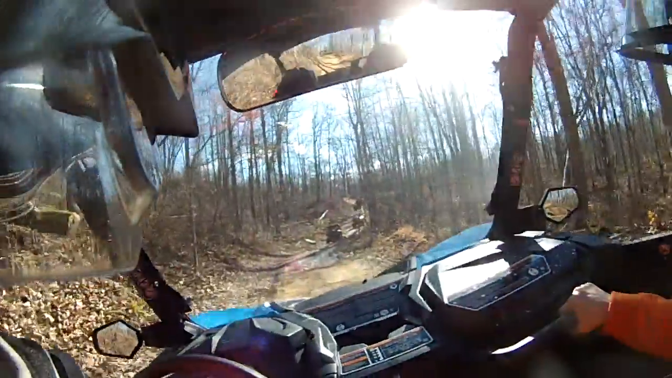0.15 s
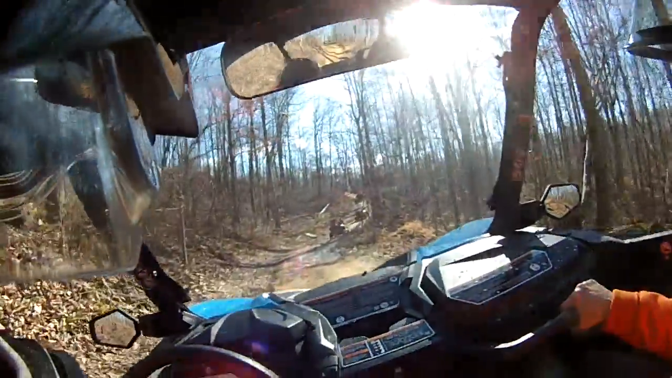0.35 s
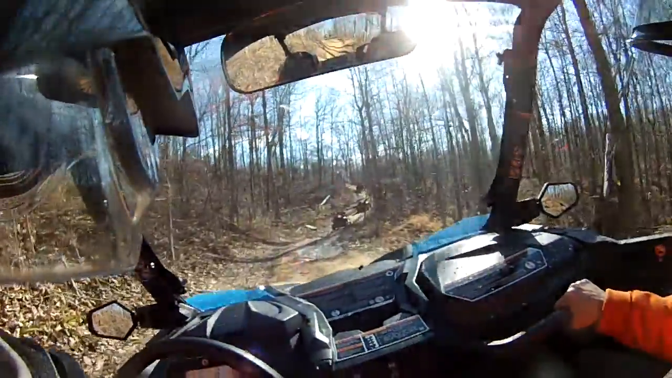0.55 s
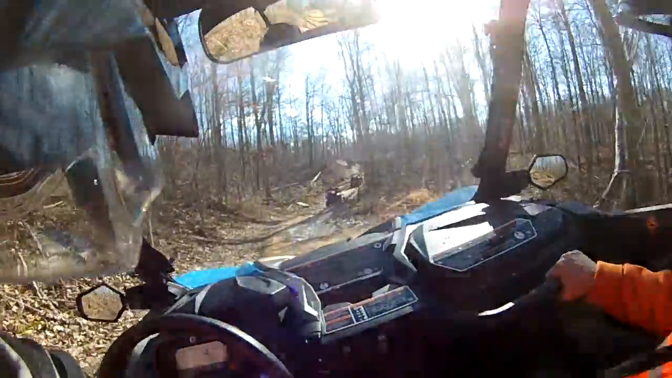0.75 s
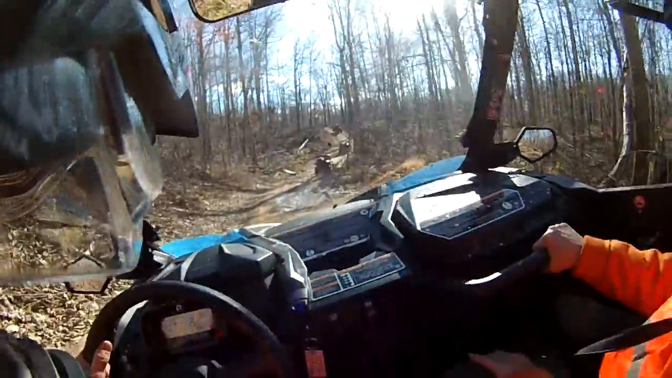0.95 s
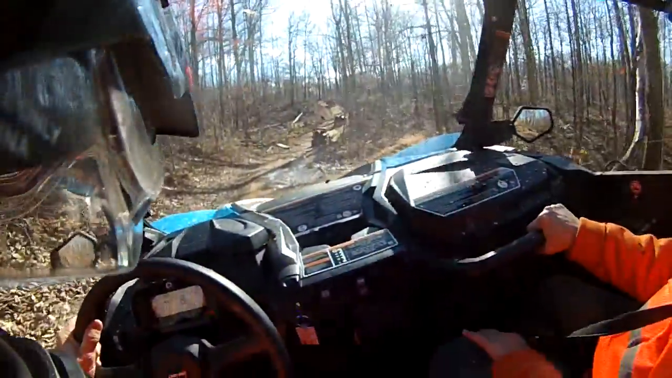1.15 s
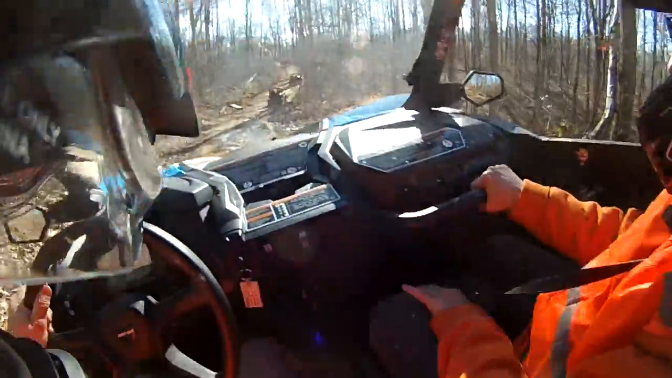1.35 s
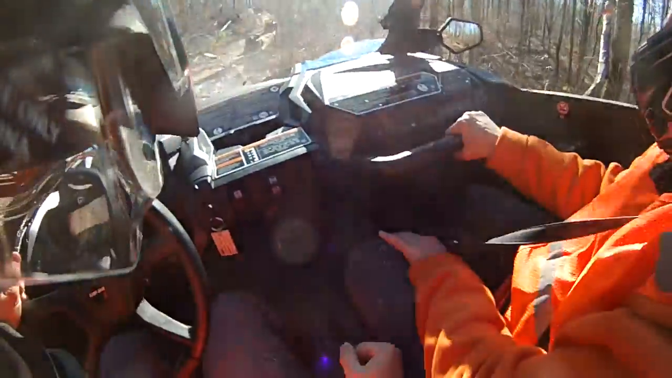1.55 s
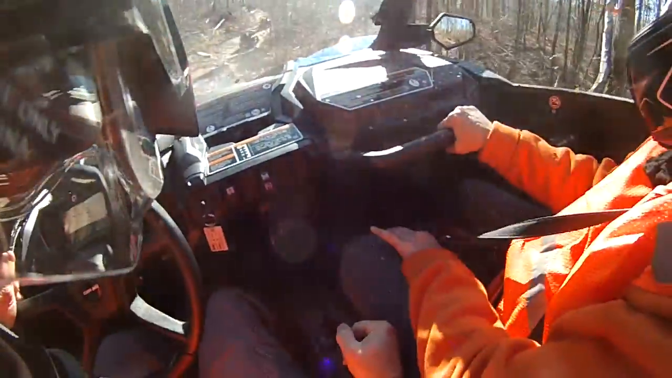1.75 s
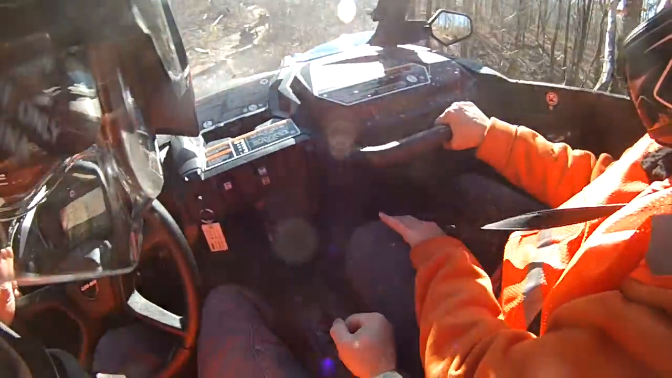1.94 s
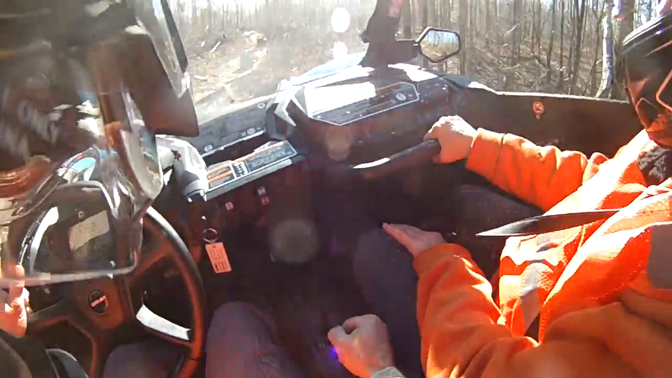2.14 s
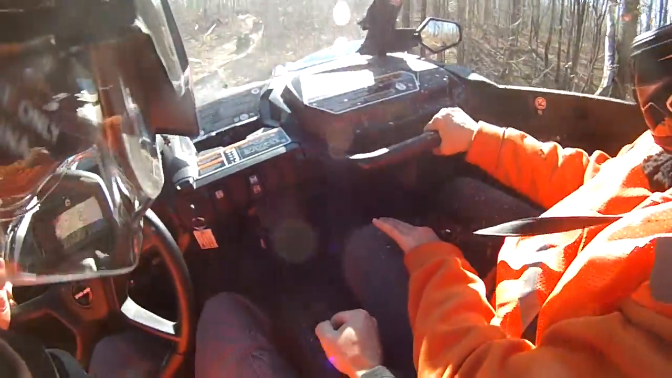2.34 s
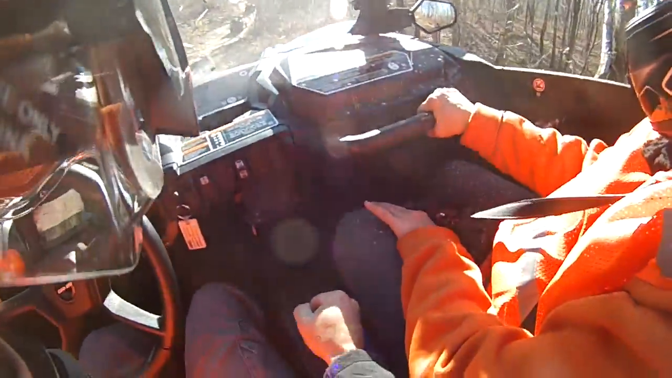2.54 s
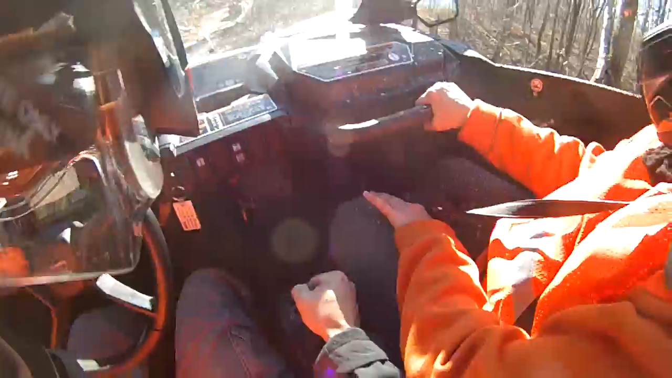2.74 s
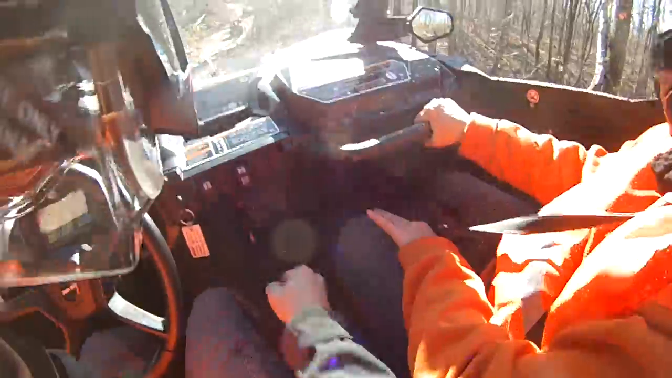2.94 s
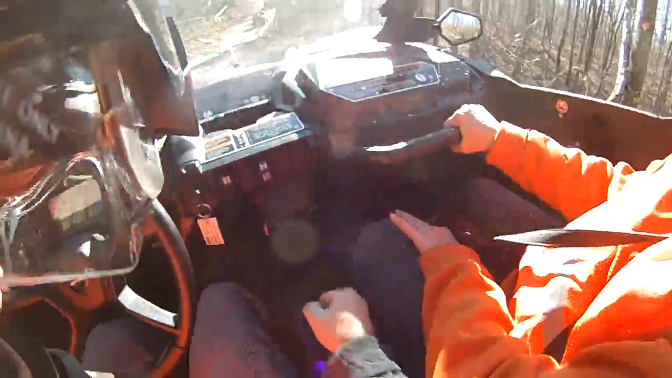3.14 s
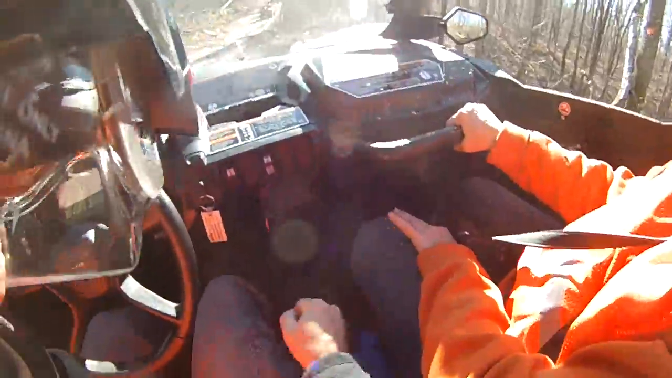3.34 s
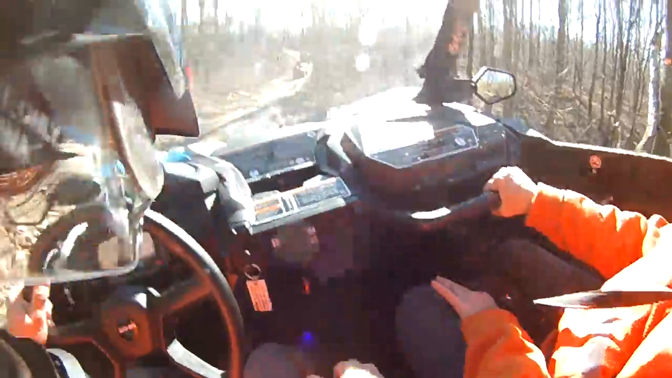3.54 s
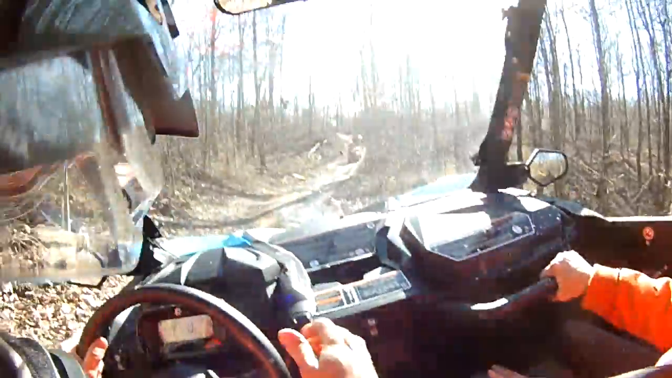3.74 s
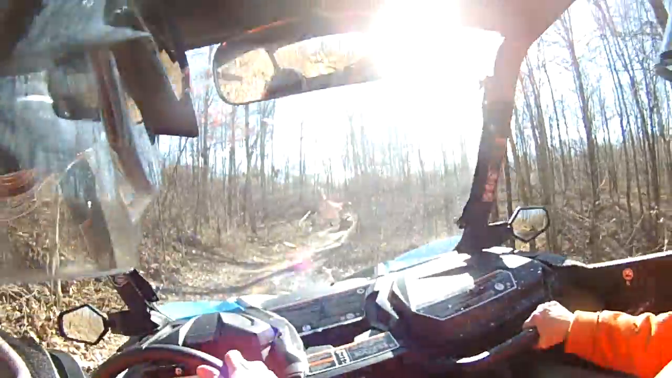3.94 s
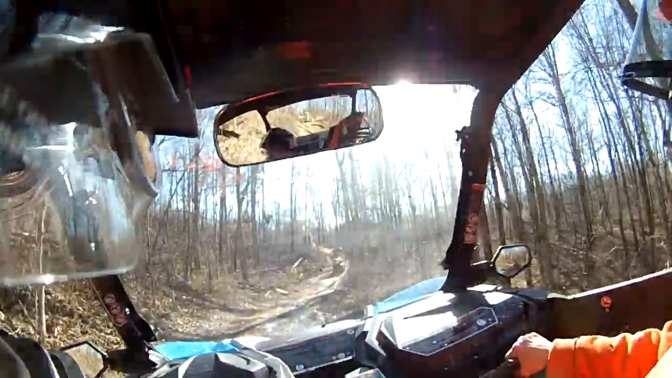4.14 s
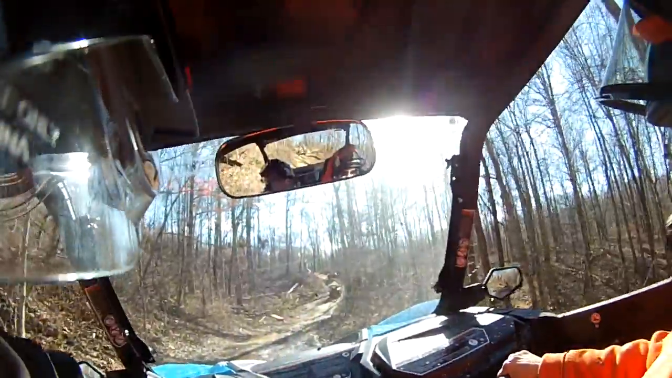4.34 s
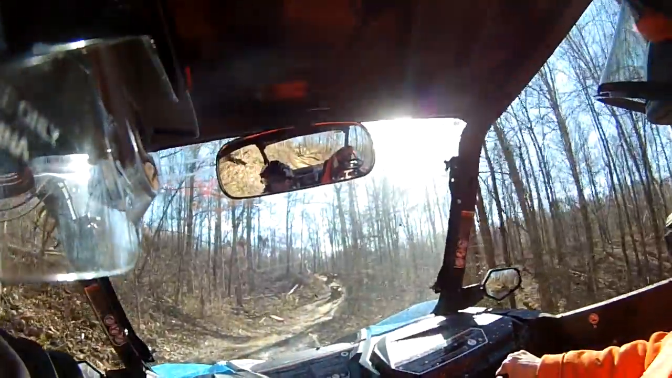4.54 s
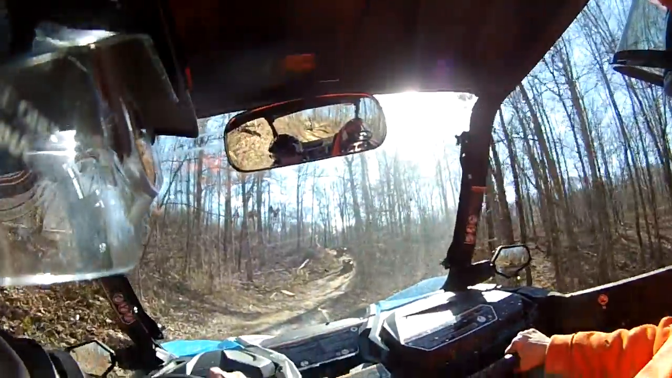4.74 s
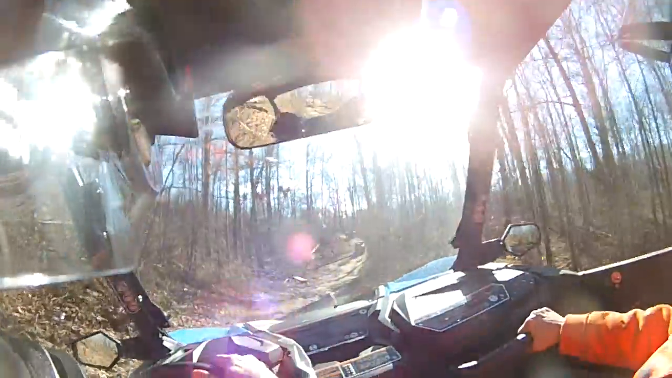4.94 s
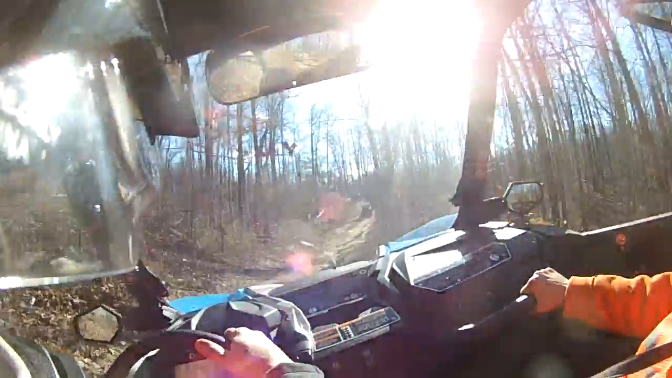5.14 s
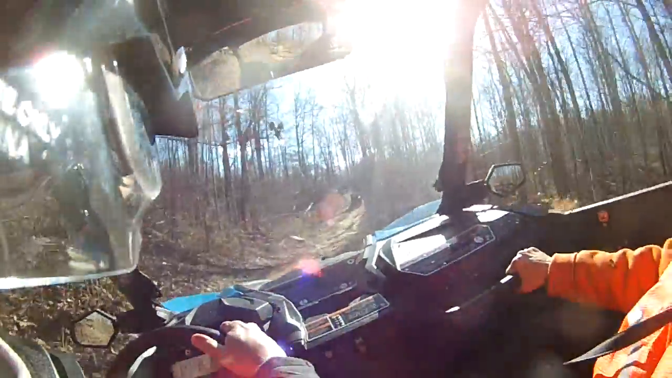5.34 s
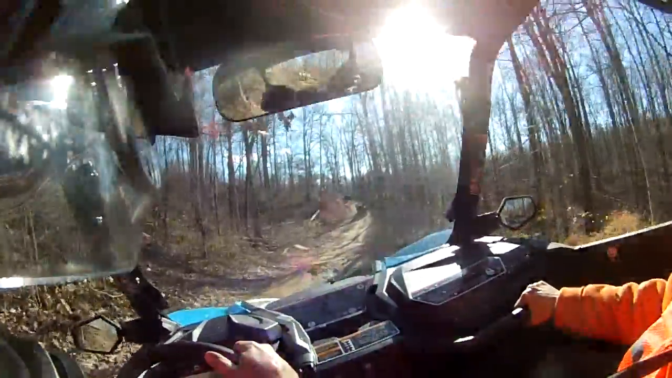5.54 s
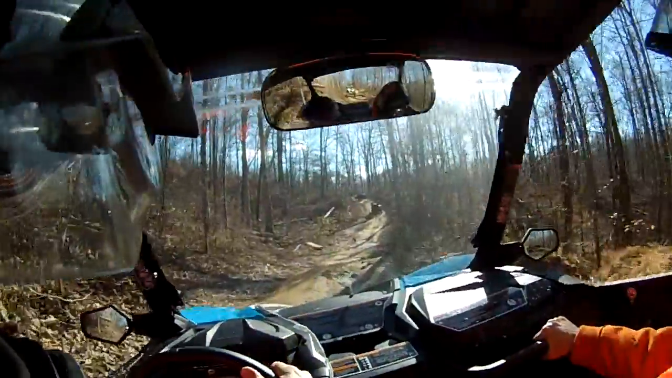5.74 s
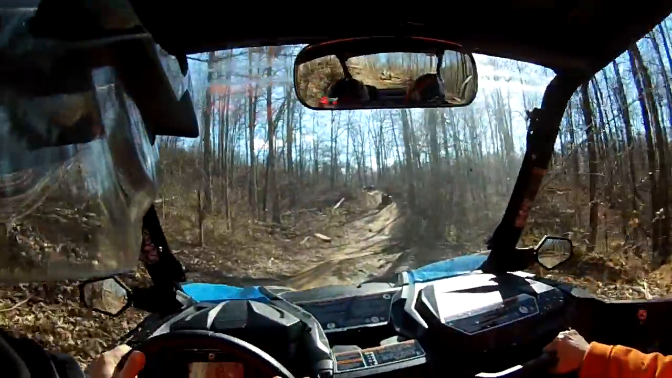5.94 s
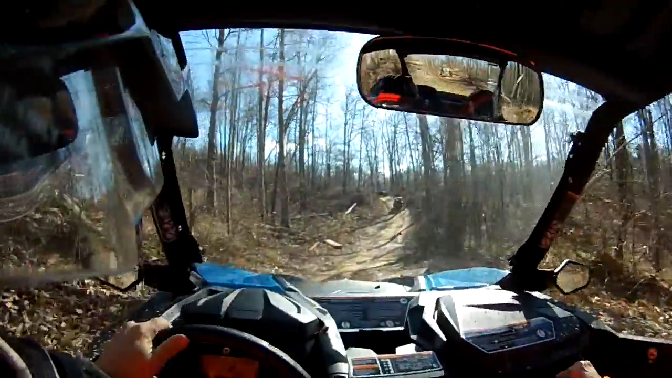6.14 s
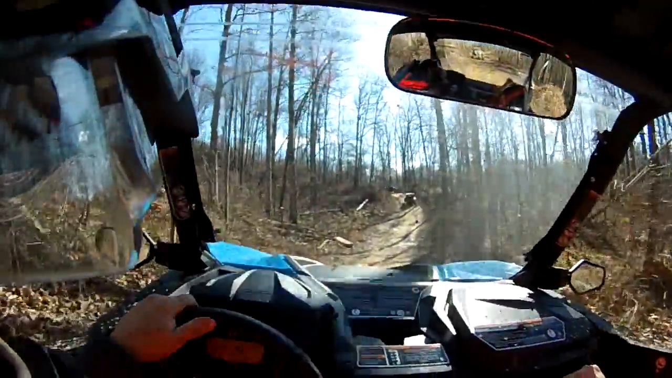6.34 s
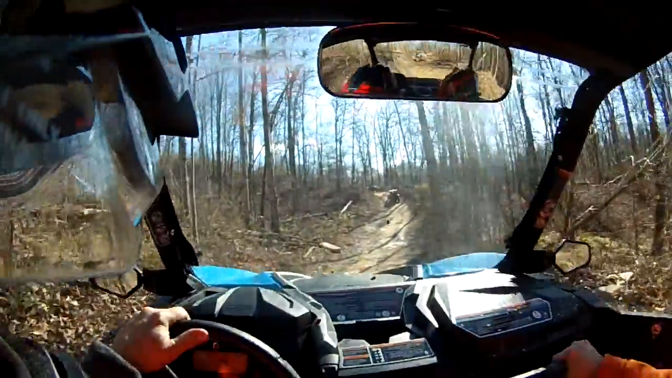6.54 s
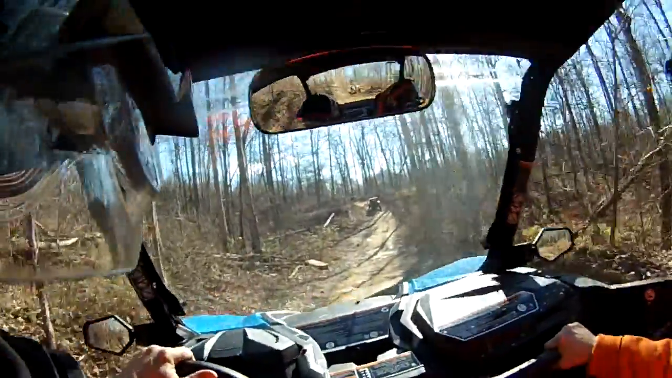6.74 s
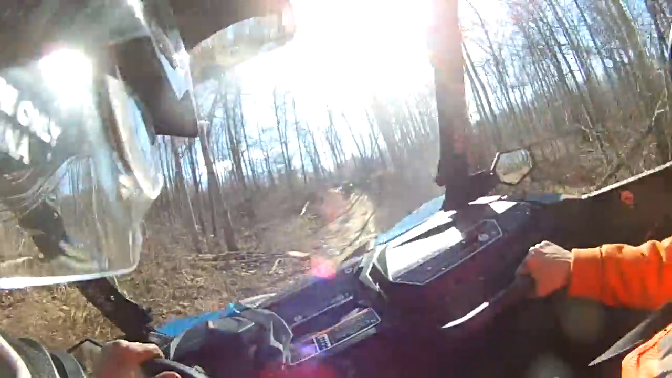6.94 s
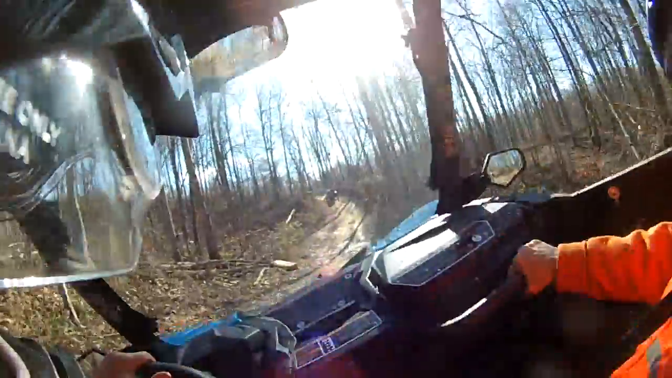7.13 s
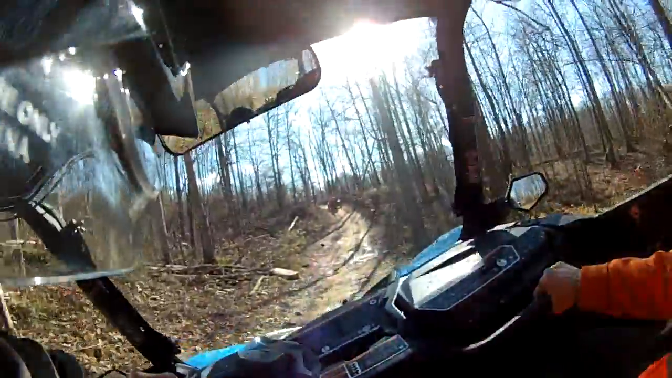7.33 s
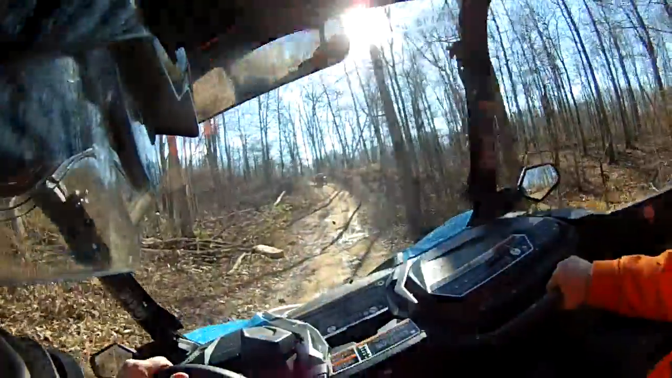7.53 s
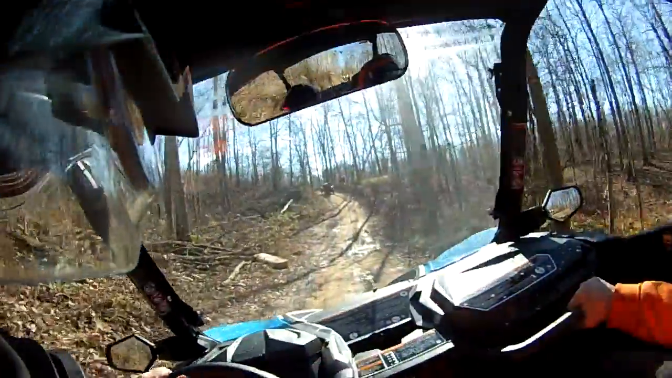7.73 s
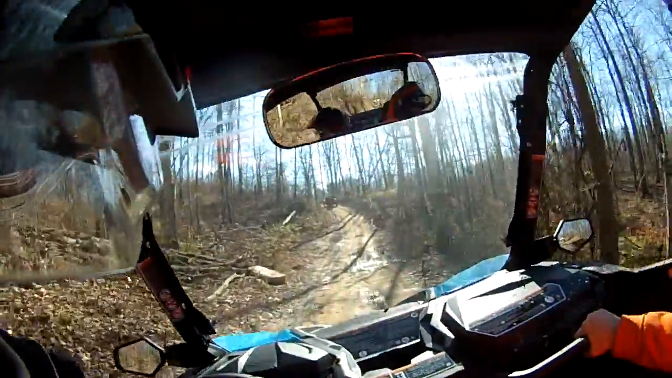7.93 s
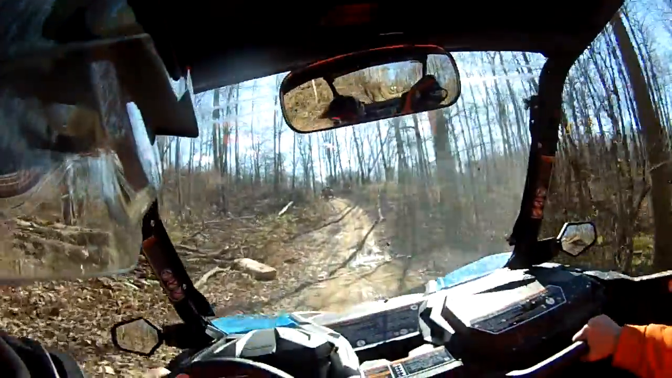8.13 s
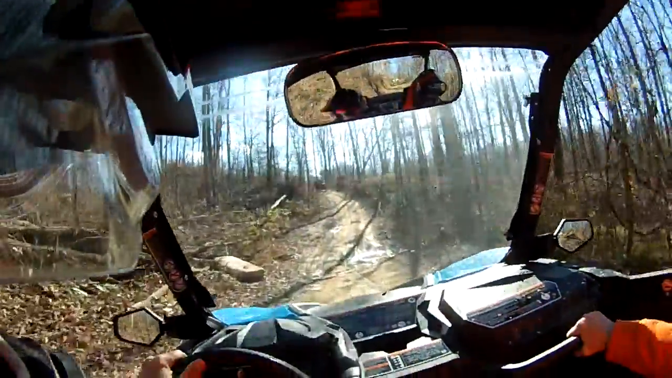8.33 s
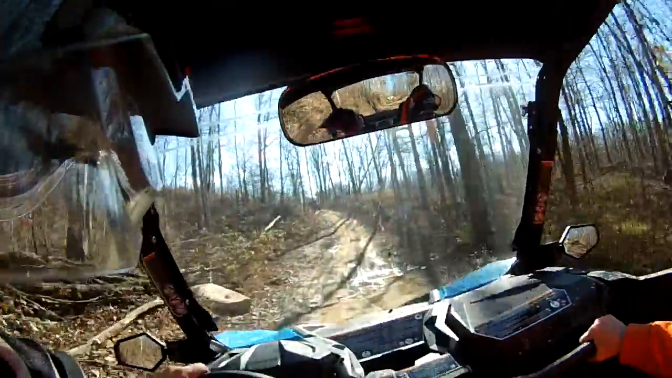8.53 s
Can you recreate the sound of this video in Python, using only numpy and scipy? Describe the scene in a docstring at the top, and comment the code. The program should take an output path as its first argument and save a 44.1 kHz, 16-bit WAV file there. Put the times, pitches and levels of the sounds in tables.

```python
"""A twin-cylinder engine booms, heard from the open cab of an off-road buggy on a leafy forest trail.
It drops to idle while the brakes squeak faintly, something loose knocks in the cab, twice clearly,
and it pulls away with gear whine and clatter over chassis rumble and crackling leaves.
The exhaust is a harmonic series on the four-stroke cycle rate; order k lies at k times that rate.
A second machine drones nearby, and beats arise where its harmonics lie close to the buggy's."""
import sys
import numpy as np
from scipy import signal
from scipy.fft import rfft, irfft, next_fast_len
from scipy.io import wavfile
from scipy.ndimage import map_coordinates

SR = 44100
rng = np.random.default_rng(int(sys.argv[2]) if len(sys.argv) > 2 else 0)


def bounce(signal):
    """Save signal as a 16-bit WAV file at the path given by the first command-line argument."""
    frames = np.transpose(np.atleast_2d(signal))
    limited = np.clip(frames, -1, 1)
    pcm = np.round(limited * 32767).astype(np.int16)
    wavfile.write(sys.argv[1], SR, pcm)


N = 382788
TIME = np.arange(N) / SR

# Spectra of chassis rumble and of trail hiss: f/Hz, relative density/dB
RUMBLE_SPECTRUM = [(12, -9.5), (28, -2), (45, 4.5), (62, 2.5), (78, -2.5), (110, -7), (160, 4), (200, -10),
                   (250, -15.5), (400, -29), (900, -53.5)]
HISS_SPECTRUM = [(3000, 3.5), (4800, -8.5), (5700, -9.5), (6400, -2.5), (7800, -2), (9200, 1),
                 (10800, -5.5), (12500, -9), (13900, -2), (15200, -11)]
# Cycle rate of the second machine: t/s, f/Hz
NEIGHBOUR_REVS = [(0, 36), (1.6, 38.8), (2.3, 38.3), (2.52, 35.7), (3.05, 38.5), (3.42, 37.6), (3.75, 32.6),
                  (4.1, 31.2), (4.5, 31.1), (5.1, 27.7), (5.42, 27.2), (5.65, 30.4), (5.95, 27.7),
                  (6.25, 27.1), (6.7, 31.1), (7.15, 30.1), (7.6, 31.8), (8.68, 31.9)]
# Its strength through the trees: t/s, level/dB
NEIGHBOUR_LEVEL = [(0, -40), (1.35, -36.5), (2.05, -41), (3.1, -30.5), (3.7, -34.5), (4.4, -30.5),
                   (5.35, -30.5), (5.75, -34.5), (7.2, -35.5), (8.68, -33.5)]
# Its harmonics: order, relative level/dB
NEIGHBOUR_HARMONICS = [(1, -4.5), (2, -1.5), (3, -2), (4, -11.5), (5, 0.5), (8, -4), (10, -11.5)]
# Its transmission through woods and cab: f/Hz, gain/dB
WOODS_RESPONSE = [(30, -11), (55, -9.5), (64, -4), (76, 4), (88, 3), (100, -5.5), (115, -3), (135, 2.5),
                  (160, 2.5), (178, -9.5), (195, -10.5), (300, -16.5), (390, -15)]
# Brake squeaks: t/s, duration/s, start f/Hz, end f/Hz, level/dB
BRAKE_SQUEAKS = [(0.718, 0.036, 9560, 9400, -60), (0.869, 0.041, 9620, 9500, -66),
                 (0.937, 0.055, 7600, 7400, -56), (0.997, .05, 7700, 7560, -64),
                 (1.14, .05, 14020, 14080, -70), (1.17, .05, 7500, 7490, -66),
                 (1.5, 0.045, 14060, 14130, -56), (1.778, 0.1, 9700, 9550, -59),
                 (1.894, 0.1, 7570, 7550, -62.5), (1.991, 0.11, 7520, 7500, -56),
                 (2.104, 0.11, 7430, 7570, -60.5)]
# Knocks in the cab: t/s, level/dB, time to decay by 60 dB/s
CAB_KNOCKS = [(2.673, -45.5, .08), (2.924, -36, 0.14), (2.939, -44, 0.053), (2.966, -42, 0.075),
              (3.322, -30.5, 0.079), (3.344, -49, 0.055), (3.875, -45, 0.18), (7.08, -35, 0.072)]
# Spectrum of the loose part: f/Hz, relative density/dB
PART_SPECTRUM = [(150, -28), (310, 13), (400, 6), (490, 2), (700, -7), (1100, -9), (1390, 2.5),
                 (1560, -0.5), (2035, -1), (2600, -15), (3450, -21), (4800, -34), (8500, -24.5),
                 (15000, -35)]
# Cycle rate of the buggy's engine: t/s, f/Hz
ENGINE_REVS = [(0, 34.03), (0.43, 31.89), (1, 25.75), (1.72, 15.18), (3.6, 14.97), (3.88, 18.92),
               (4.12, 24.72), (4.55, 30.05), (4.87, 30.31), (5.29, 37.81), (6, 37.85), (6.3, 36.62),
               (6.57, 33.05), (6.87, 32.24), (7.13, 34.83), (7.3, 30.46), (7.53, 33.55), (7.82, 34.47),
               (8.32, 38.43), (8.53, 35.89), (8.68, 36.9)]
# The driver's foot: t/s, throttle opening (0-1)
THROTTLE_OPENING = [(0, 0.03), (3.85, 0.05), (3.9, 0.33), (4.35, 1), (4.8, .8), (5.1, 0.98), (5.85, 0.6),
                    (6.35, .72), (6.68, .36), (7.05, 0.45), (7.33, 0.2), (7.6, 0.36), (8.25, 0.72),
                    (8.68, 0.36)]
# Meshing tones of gear teeth and chain links: order, relative level/dB
GEAR_ORDERS = [(22, -54), (24, -53), (34, -52.5), (40, -54), (44, -47.5), (47, -54), (52, -54.5), (59, -53)]
# Resonances of the gear casing: f/Hz, gain/dB
CASING_RESPONSE = [(700, -7.5), (835, -0.5), (1000, -10.5), (1200, -8.5), (1295, -1), (1370, -9.5),
                   (1470, -6.5), (1570, -8.5), (1670, -4), (1760, -3), (1950, -7), (2240, -7.5), (2500, -8)]
# Spectrum of valve gear and belt drive: f/Hz, relative density/dB
CLATTER_SPECTRUM = [(290, -43), (500, 3), (542, 3), (762, -10), (842, -3), (913, -2), (989, -2.5),
                    (1160, -5), (1280, -8.5), (1680, -3.5), (1860, -7.5), (2320, -5.5), (3200, -17.5),
                    (4240, -47), (5500, -33), (7150, -67), (12100, -120)]
# Panel modes: f/Hz, bandwidth/Hz, gain/dB
PANEL_MODES = [(823, 11, 3.5), (1020, 26, -5), (1360, 38, -2), (1487, 135, -2.5), (1720, 34, -9),
               (2030, 18, -1.5), (2268, 16, -6.5), (3135, 5.2, -1.5)]
# Spectrum of the turbulent gas: f/Hz, relative density/dB
ROAR_SPECTRUM = [(120, -22), (215, -19), (250, -2), (290, 13.5), (335, -8.5), (390, 13.5), (450, -5),
                 (520, -32), (700, 0), (1100, -48), (3000, -58)]
# Briefly prominent exhaust overtones: start t/s, end t/s, order, relative level/dB
GROWL_EVENTS = [(6.15, 6.85, 8, -39), (6.7, 7.2, 12, -39), (7.45, 7.85, 11, -41)]
# Response of the pipe, for the rasping orders: f/Hz, gain/dB
PIPE_RESPONSE = [(14, -14), (26, 5), (37, 3), (60, 1), (130, 13.5), (200, -5), (270, -6.5), (325, -9.5),
                 (385, -8.5), (520, -15.5), (680, -20.5), (860, -25), (1700, -28.5), (2400, -33.5)]
# The boom, the fourth exhaust order: t/s, level/dB
BOOM_LEVEL = [(0, -20), (.5, -28), (.95, -25), (1.3, -34.5), (1.8, -56.5), (3.65, -30), (4.1, -25.5),
              (4.9, -24.5), (5.15, -15.5), (5.62, -16), (6.22, -29), (6.48, -21.5), (7, -32.5), (7.17, -22),
              (7.38, -33.5), (7.8, -20.5), (8.15, -18.5), (8.68, -29)]
# The orders around it: order, level/dB, full-throttle gain/dB, overrun gain/dB
THUMP_ORDERS = [(2, -36.5, 2, 6.5), (3, -34.5, 1.5, 8), (5, -39, 8.5, 0.5), (6, -42.5, 7, -5)]
# Response of the cab to those orders: f/Hz, gain/dB
CAB_RESPONSE = [(30, -5), (45, 0.5), (62, 5), (78, -1.5), (90, 2.5), (110, -2), (140, 3.5), (165, 4),
                (188, -0.5), (205, -2.5), (228, 0), (260, -5.5)]

# Level laws: base level/dB, gain per octave of revs/dB, full-throttle gain/dB, overrun gain/dB
RASP_LAW = (-46, 8.5, 6.5, -1)
CLATTER_LAW = (-45.5, 9.5, 5, 2)
HISS_LAW = (-58, 11.5, 2, 0.6)
WHINE_LAW = (-4.5, 19, 0.5, -0.5)
IDLE_HZ, CRUISE_HZ = 15, 32  # cycle rates
BOOM_ORDER, THUMP_DB_PER_OCTAVE = 4, 6.5


def gain_of(db):
    """Amplitude ratio: tenfold for every 20 dB."""
    return 10 ** (np.asarray(db) / 20)


def unit_rms(x):
    """Normalisation to unit mean power."""
    return x / np.sqrt(np.mean(x ** 2) + 1e-20)


def curves(rows):
    """Linear interpolation of each column of a time table at every sample."""
    times, *columns = np.transpose(rows)
    return [np.interp(TIME, times, column) for column in columns]


def db_at(spectrum, hz):
    """Interpolation of a spectrum's level on a logarithmic frequency axis."""
    f, db = np.transpose(spectrum)
    return np.interp(np.log(hz + 1), np.log(f + 1), db)


def coloured(x, spectrum):
    """Filtering by multiplication in the frequency domain; the result has rms 1."""
    size = next_fast_len(N)
    response = gain_of(db_at(spectrum, np.fft.rfftfreq(size, 1 / SR)))
    return unit_rms(irfft(rfft(x, size) * response, size)[:N])


def wander(per_s):
    """Smooth random modulation of rms 1: a spline through per_s random values a second."""
    knots = rng.standard_normal(4096)
    position = np.arange(0, N, 32) / SR * per_s
    return unit_rms(map_coordinates(knots, [position], order=3, mode="wrap")).repeat(32)[:N]


def add(mix, start_s, sound):
    """Superposition of a sound on the mix from start_s onward."""
    part = mix[round(start_s * SR):][:len(sound)]
    part += sound[:len(part)]


def crank_angle(cycle_hz):
    """Phase of the four-stroke cycle, the integral of its rate; jitter makes firings early or late."""
    return 2 * np.pi * np.cumsum(cycle_hz) / SR + .02 * wander(40)


def overrun(cycle_hz, throttle, shut=.15, span_hz=12):
    """Engine braking, 0-1: the wheels drive the engine when the throttle is shut above idle."""
    return np.clip(1 - throttle / shut, 0, 1) * np.clip((cycle_hz - IDLE_HZ) / span_hz, 0, 1)


def layer_level(law, cycle_hz, throttle):
    """Level in dB from a power law in revs, with added terms for load and overrun."""
    base_db, octave_db, load_db, coast_db = law
    revs_db = octave_db * np.log2(cycle_hz / CRUISE_HZ)
    return base_db + revs_db + load_db * throttle + coast_db * overrun(cycle_hz, throttle)


def trail(hiss_db, rumble_db=-39, bumps_db=4.5, crackle_db=-75, crackles_per_s=60, snap_s=0.0027):
    """Random excitation: bumps shake the chassis, hiss rises with revs, leaves snap under the tyres."""
    shaking_db = rumble_db + 0.074 * (hiss_db - hiss_db.mean()) + bumps_db * wander(6.6)
    rumble = coloured(rng.standard_normal(N), RUMBLE_SPECTRUM) * gain_of(shaking_db)
    hiss = coloured(rng.standard_normal(N), HISS_SPECTRUM) * gain_of(hiss_db + 1)
    onsets = rng.random(N) < crackles_per_s / SR
    snaps = onsets * gain_of(4 * np.minimum(rng.exponential(1, N), 4))
    decays = signal.lfilter([1], [1, -np.exp(-1 / (snap_s * SR))], snaps)
    crackle = coloured(decays * rng.standard_normal(N), HISS_SPECTRUM)
    return rumble + hiss + gain_of(crackle_db) * crackle


def neighbour(waver_db=2):
    """Transmission loss: woods and cab muffle the harmonic drone of the second machine."""
    (cycle_hz,), (level_db,) = curves(NEIGHBOUR_REVS), curves(NEIGHBOUR_LEVEL)
    angle, out = crank_angle(cycle_hz), np.zeros(N)
    for order, db in NEIGHBOUR_HARMONICS:
        tone = np.cos(order * angle + 2 * np.pi * rng.random())
        heard_db = level_db + db + db_at(WOODS_RESPONSE, order * cycle_hz)
        out += gain_of(heard_db + waver_db * wander(6)) * tone
    return np.sqrt(2) * out


def hum(start_s=0.5, end_s=5, hz=68, level_db=-34.5):
    """Beating: a pure tone swells through the lull and interferes with nearby engine harmonics."""
    out, t = np.zeros(N), np.arange(0, end_s - start_s, 1 / SR)
    tone = np.sqrt(2) * np.sin(2 * np.pi * hz * t)
    add(out, start_s, gain_of(level_db) * signal.windows.tukey(len(t), .3) * tone)
    return out


def brakes(waver=0.0022):
    """Friction-induced vibration: pads catch the discs in short, thin, gliding squeaks."""
    out, drift = np.zeros(N), 1 + waver * wander(130)
    for start_s, length_s, start_hz, end_hz, db in BRAKE_SQUEAKS:
        n = int(length_s * SR)
        hz = np.linspace(start_hz, end_hz, n) * drift[int(start_s * SR):][:n]
        tone = np.sqrt(2) * np.sin(2 * np.pi * np.cumsum(hz) / SR)
        add(out, start_s, gain_of(db) * signal.windows.tukey(n, .6) * tone)
    return out


def knocks(rise_s=.0007):
    """Damped vibration: each knock of the loose part is hollow noise that decays exponentially."""
    envelope, t = np.zeros(N), TIME[:SR // 2]
    rise = 1 - np.exp(-t / rise_s)
    for start_s, db, t60 in CAB_KNOCKS:
        add(envelope, start_s, gain_of(db - 60 * t / t60) * rise)
    return envelope * coloured(rng.standard_normal(N), PART_SPECTRUM)


def gear_whine(cycle_hz, level_db):
    """Resonance: meshing tones swell as the revs carry them across the modes of the casing."""
    out = np.zeros(N)
    angle = 2 * np.pi * np.cumsum(cycle_hz) / SR  # steadied by the flywheel
    for order, db in GEAR_ORDERS:
        backlash_rad, flutter_db = .55 * wander(45), 2.2 * wander(30)
        tone_db = db + db_at(CASING_RESPONSE, order * cycle_hz) + flutter_db
        out += gain_of(tone_db) * np.cos(order * angle + backlash_rad)
    return np.sqrt(2) * out * gain_of(level_db)


def clatter(angle, level_db, grain_db=2, flicker_db=.5, trim_db=-3.5):
    """Forced vibration: the dense rattle of valve gear and belt drive excites the panel modes."""
    throb = 1 + 0.019 * np.cos(angle) + 0.04 * np.cos(6 * angle)  # six valve beats a cycle
    grains = rng.standard_normal(N) * gain_of(grain_db * wander(420))
    rattle = coloured(grains * throb, CLATTER_SPECTRUM)
    ringing = sum(gain_of(db) * signal.lfilter(*signal.iirpeak(hz, hz / width_hz, SR), rattle)
                  for hz, width_hz, db in PANEL_MODES)
    return unit_rms(rattle + ringing) * gain_of(level_db + trim_db + flicker_db * wander(25))


def roar(angle, rasp_db, puff_depth=0.48, pivot_db=-51, growth=0.96, trim_db=-6):
    """Turbulence: gas noise puffs twice a cycle and grows slightly less than the pitched rasp."""
    puffs = rng.standard_normal(N) * (1 + puff_depth * np.cos(2 * angle))
    level_db = pivot_db + growth * (rasp_db - pivot_db) + trim_db
    return coloured(puffs, ROAR_SPECTRUM) * gain_of(level_db)


def growls(angle, trim_db=-1):
    """Roughness: single exhaust overtones swell and fade under rapid phase and amplitude modulation."""
    out = np.zeros(N)
    for start_s, end_s, order, db in GROWL_EVENTS:
        jitter_rad, flutter_db = .7 * wander(50), 2.2 * wander(30)
        tone = gain_of(db + trim_db + flutter_db) * np.cos(order * angle + jitter_rad)
        burst = tone[round(start_s * SR):round(end_s * SR)]
        add(out, start_s, np.sqrt(2) * burst * signal.windows.tukey(len(burst), .5))
    return out


def exhaust(angle, cycle_hz, throttle, rasp_db, pipe_hz=115, pipe_width_hz=75, smear_rad=1.78):
    """Fourier series of two uneven firings a cycle ringing the pipe: low orders boom, upper ones rasp.
    Dispersion by the cab's echoes spreads the thumps into a burble; on the overrun they stay distinct."""
    out, coasting = np.zeros(N), overrun(cycle_hz, throttle)
    smear = smear_rad * (1 - coasting)
    thump_db = THUMP_DB_PER_OCTAVE * np.log2(cycle_hz / CRUISE_HZ)
    low_db = {}
    for order, db, load_db, coast_db in THUMP_ORDERS:
        source_db = thump_db + db + load_db * throttle + coast_db * coasting
        low_db[order] = source_db + db_at(CAB_RESPONSE, order * cycle_hz)
    low_db[BOOM_ORDER], = curves(BOOM_LEVEL)
    for order in range(1, 61):
        hz = order * cycle_hz
        pipe_lag = np.arctan2(hz * pipe_width_hz, pipe_hz ** 2 - hz ** 2)
        # a weaker second firing, 3/8 of a cycle later, shifts the phase
        pair_phase = np.angle(1 + 0.45 * np.exp(-2j * np.pi * order * 3 / 8))
        if order in low_db:
            flutter_db = 1.1 * wander(14)
            # echoes delay the orders around the boom, the more the further they lie from it
            echo_phase = -smear * (order - BOOM_ORDER) ** 2 / 2
            level_db = low_db[order]
        else:
            flutter_db = 3.3 * wander(5)
            echo_phase = 2 * np.pi * rng.random()  # reflections scramble the other orders
            even_db = -3 if order % 2 == 0 else 0
            level_db = rasp_db + db_at(PIPE_RESPONSE, hz) + even_db
        phase = order * angle - pipe_lag + pair_phase + echo_phase
        out += gain_of(level_db + flutter_db) * np.cos(phase)
    return np.sqrt(2) * out * gain_of(.5 * wander(45))


def scene():
    """Superposition at the driver's seat; revs and throttle set the rasp, clatter, hiss and whine."""
    (cycle_hz,), (throttle,) = curves(ENGINE_REVS), curves(THROTTLE_OPENING)
    rasp_db, clatter_db, hiss_db, whine_db = (
        layer_level(law, cycle_hz, throttle) for law in (RASP_LAW, CLATTER_LAW, HISS_LAW, WHINE_LAW))
    angle = crank_angle(cycle_hz)
    engine = exhaust(angle, cycle_hz, throttle, rasp_db) + growls(angle) + roar(angle, rasp_db)
    machinery = clatter(angle, clatter_db) + gear_whine(cycle_hz, whine_db)
    return (engine + machinery + trail(hiss_db) + neighbour() + hum() + brakes() + knocks())[None]


def record(dry):
    """Band limiting: a linear-phase low-pass filter removes the treble above 15.3 kHz."""
    low_pass = signal.firwin(511, 15300, window=("kaiser", 9), fs=SR)
    return signal.oaconvolve(dry, low_pass[None], "same")


dry = scene()
out = record(dry)
bounce(out)
```